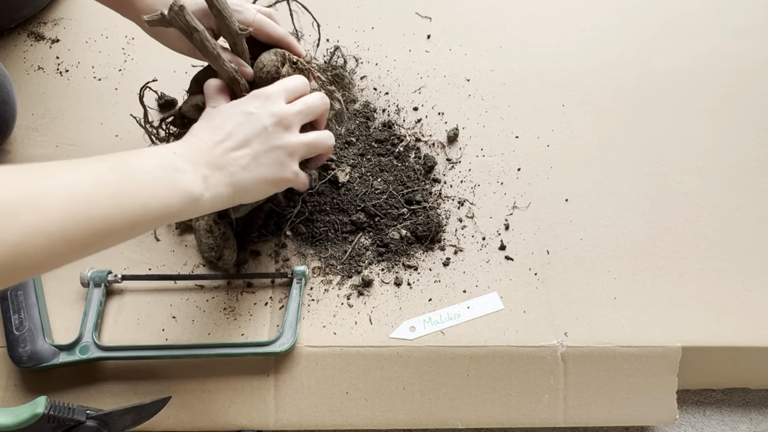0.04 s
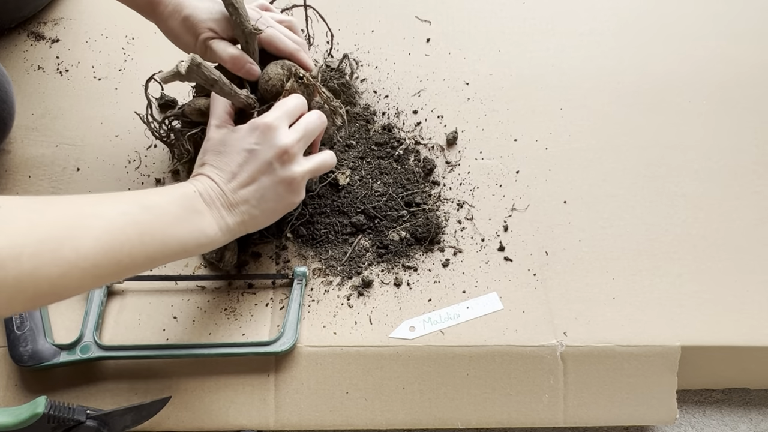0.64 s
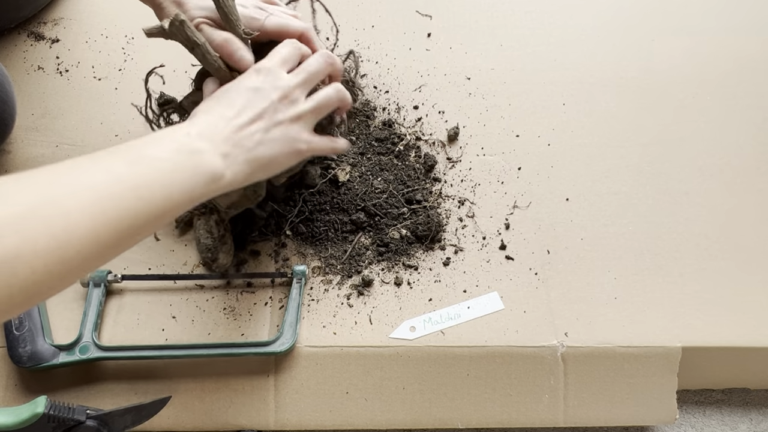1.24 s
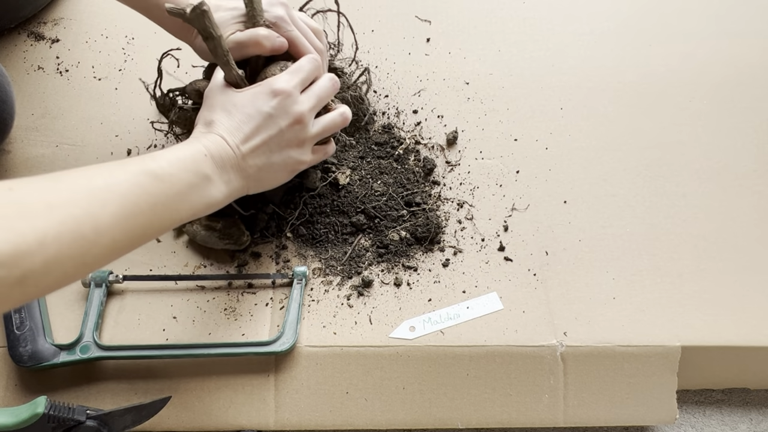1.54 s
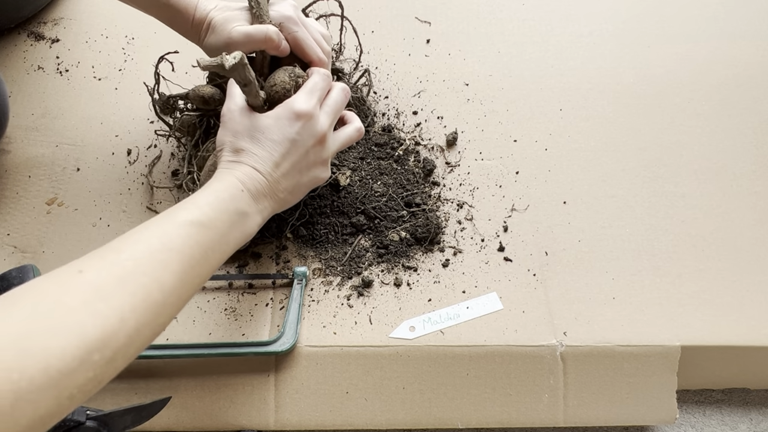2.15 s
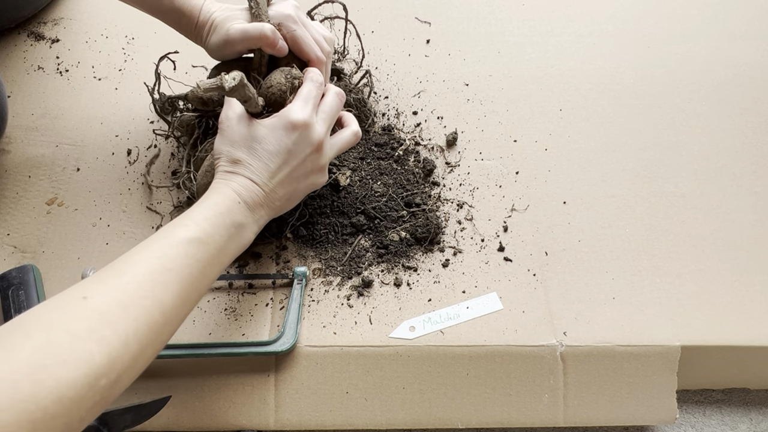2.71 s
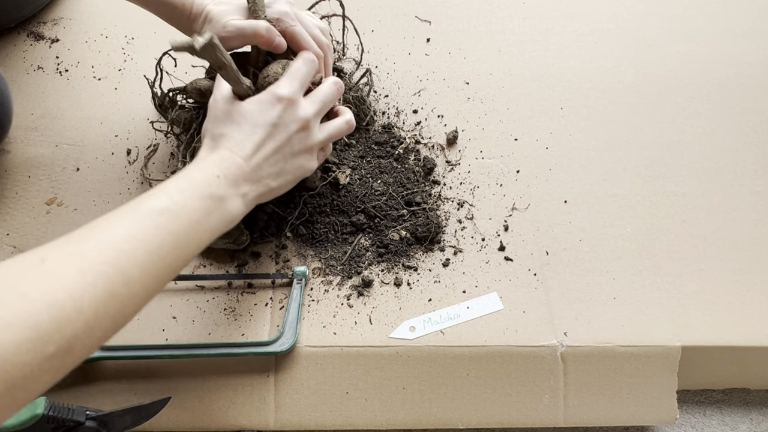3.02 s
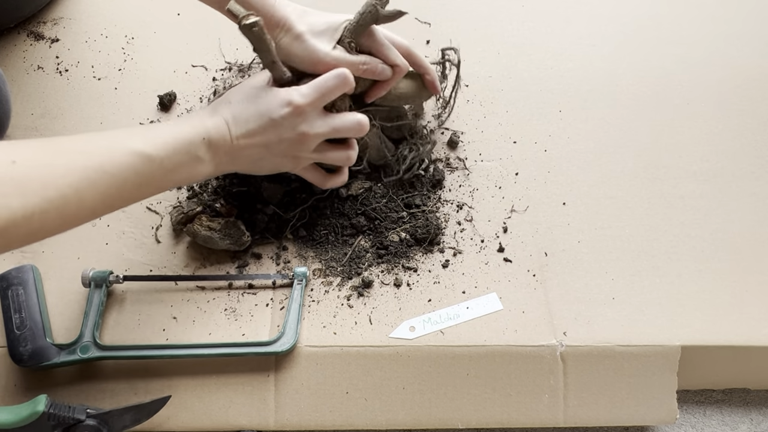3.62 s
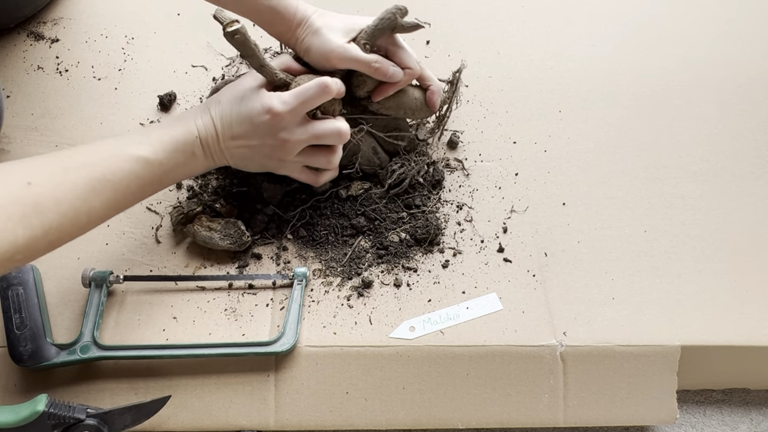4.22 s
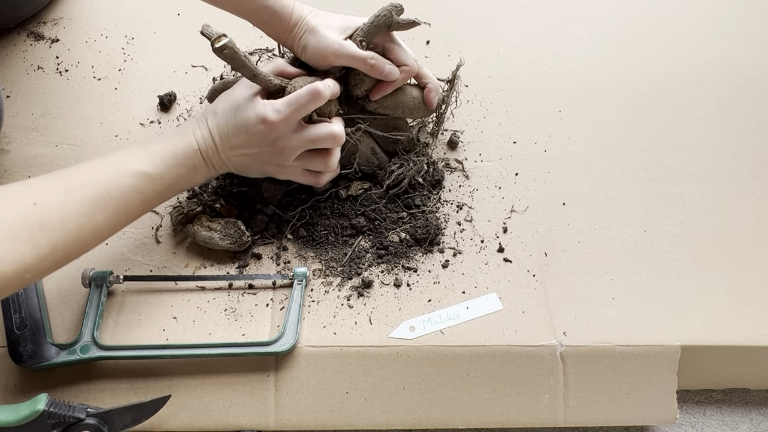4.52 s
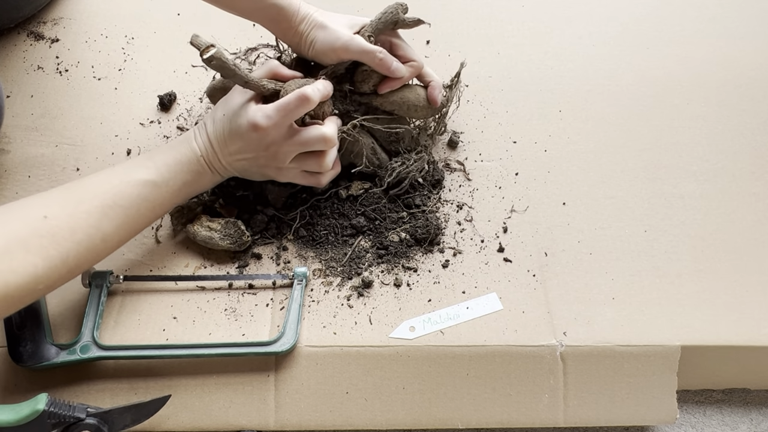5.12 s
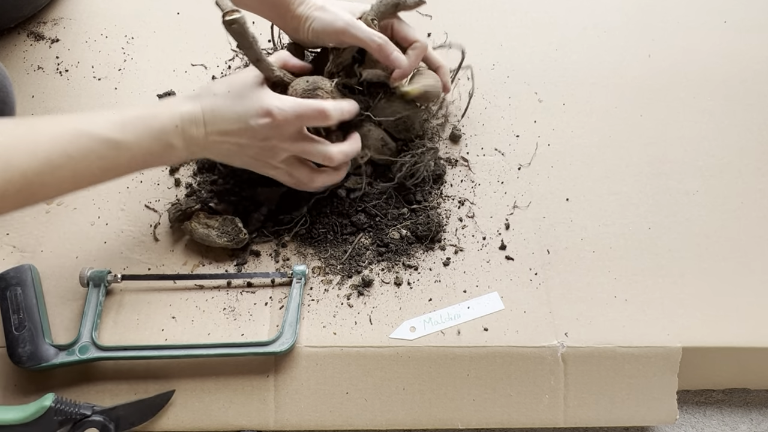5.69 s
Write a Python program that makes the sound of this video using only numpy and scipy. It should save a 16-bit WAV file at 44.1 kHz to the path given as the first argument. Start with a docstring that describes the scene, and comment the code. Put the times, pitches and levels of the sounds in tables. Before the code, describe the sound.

Hands twist a dry root clump apart on cardboard, with sharp snaps, crackling fibres, crumbling soil and soft knocks.

```python
"""In a small room, two hands twist a dry clump of tubers apart on a sheet of cardboard.
Roots snap one by one or tear in bundles of fibres: each fracture releases strain as a sharp crack,
and the recoiling root clacks and rings. Soil and rootlets crackle, while the clump's knocks and
friction drive the resonances of the sheet. The walls echo briefly over a low rumble.
A camera with two closely spaced microphones looks down on the work."""
import sys
import numpy as np
from scipy import signal
from scipy.fft import rfft, irfft, next_fast_len
from scipy.io import wavfile
from scipy.ndimage import map_coordinates

SR = 44100
rng = np.random.default_rng(int(sys.argv[2]) if len(sys.argv) > 2 else 0)


def bounce(signal):
    """Save signal as a 16-bit WAV file at the path given by the first command-line argument."""
    frames = np.transpose(np.atleast_2d(signal))
    limited = np.clip(frames, -1, 1)
    pcm = np.round(limited * 32767).astype(np.int16)
    wavfile.write(sys.argv[1], SR, pcm)


N = 253575
TIME = np.arange(N) / SR

# Roots break. Each row: start in seconds, relative crack and clack levels in dB, ring pitch in Hz.
ROOT_SNAPS = [(1.318, -40, -33.5, 1600), (1.5553, -44, -32, 2330), (1.8075, -56, -42, 1860),
              (1.828, -37.5, -45, 1870), (1.9104, -33, -27.5, 1600), (2.0542, -36.5, -46, 1890),
              (2.0759, -37, -37.5, 1870), (2.0989, -43.5, -39, 1750), (2.2536, -31, -39, 1760),
              (2.8858, -29.5, -39.5, 2700), (2.9982, -39, -40.5, 2060), (3.7038, -34, -35, 1970),
              (3.934, -54, -31, 2000), (4.1326, -23, -29, 2270), (4.143, -22, -30.5, 1980),
              (4.1528, -20, -23.5, 1750), (4.54, -26, -27.5, 2160), (4.717, -38, -41, 2270),
              (4.7418, -20.5, -20.5, 990), (4.7513, -21, -30, 2470), (4.7621, -25, -18, 1970),
              (5.024, -28.5, -46, 2570), (5.2655, -17.5, -22.5, 1890), (5.2905, -19, -27.5, 3760),
              (5.2998, -17.5, -32, 2620)]
# Fibre bundles tear. Each row: start in seconds, length in seconds, level in dB.
BUNDLE_TEARS = [(4.129, 0.04, -35), (4.739, 0.024, -33), (5.273, 0.019, -37.5), (5.296, 0.029, -26.5)]
# Resonances of the sheet. Each row: frequency in Hz, bandwidth in Hz, gain in dB.
CARDBOARD_MODES = [(75, 41, -6), (206.4, 24, -3.5), (431, 270, -7), (446, 87, 0), (721.6, 36.5, -4),
                   (900, 76, -9), (1063, 123, -6), (1320, 63, -5.5), (1672, 156, -9)]
# Tone colours of the cracks, clacks and crackle; the dips near 9.8 and 14.2 kHz come from the
# camera's audio coding. Each row: frequency in Hz, relative spectral density in dB.
CRACK_COLOUR = [(300, -14), (1500, -12), (4000, 3), (7500, -1.5), (9800, -12), (11200, 3.5), (12800, 3),
                (14200, -11), (16000, -2)]
CLACK_COLOUR = [(150, -16.5), (700, -0.5), (1200, -0.5), (1900, 6.5), (4000, -0.5), (6500, -3.5),
                (12000, -9.5)]
CRACKLE_COLOUR = [(150, -14), (700, -4.5), (3000, -6), (7500, -7), (9800, -18.5), (11100, -0.5),
                  (12900, -0.5), (14200, -7), (16000, -12.5)]


def cracks(events, crack_t60, splinter_db, tilt_db_per_octave, strain_s=0.0008, lead_s=0.002):
    """Brittle fracture releases strain as a noise burst and splinters; thinner fibres sound brighter."""
    out = np.zeros((2, N))
    t = np.arange(SR // 20) / SR - lead_s
    after = np.maximum(t, 0)
    onset = np.exp(np.minimum(t, 0) / strain_s)  # the first fibres part just before the break
    spectrum = [(hz, db + tilt_db_per_octave * np.log2(hz)) for hz, db in CRACK_COLOUR]
    for s, db, *_ in events:
        burst = rng.standard_normal((2, len(t))) * amp(-60 * after / crack_t60)
        splinters = grains(len(t), rate=5000, scatter_db=5) * amp(-60 * after / .03)
        crack = compact(onset * (burst + amp(splinter_db) * splinters), spread=.35)
        add(out, s - lead_s, at_level(coloured(crack, spectrum), db - 4, span_s=2 * lead_s))
    return out


def clacks(shudder_t60=0.025, shudder_db=-19, ring_db=-3):
    """Elastic recoil jolts a broken root, which shudders and rings at a pitch set by its thickness."""
    # Modes of a medium stem. Each row: frequency in Hz, bandwidth in Hz, gain in dB.
    stem_modes = [(830, 200, -6), (1910, 260, 29), (2830, 740, 4), (4700, 1150, 2)]
    stem_hz = stem_modes[1][0]  # the second mode gives the pitch
    out, t = np.zeros((2, N)), np.arange(SR // 20) / SR
    for s, _, db, ring_hz in ROOT_SNAPS:
        force = compact(jolt(t, shudder_db, shudder_t60), spread=.7)
        ring = filtered(force, lambda hz: resonances(hz * stem_hz / ring_hz, stem_modes))
        clack = unit(coloured(force, CLACK_COLOUR)) + amp(ring_db) * unit(ring)
        add(out, s, at_level(clack, db - 2, span_s=.004))
    return out


def ticks():
    """Hair-thin fibres fracture with a bright tick and no resonance."""
    # Each row: start in seconds, relative level in dB.
    fibre_breaks = [(0.321, -37), (1.093, -45), (1.11, -43), (1.7136, -43), (1.8946, -35.5), (1.955, -42.5),
                    (1.984, -52), (2.297, -46), (2.3205, -39), (2.3255, -37), (2.3825, -39), (2.392, -48),
                    (2.52, -46), (2.5805, -42), (2.588, -38), (2.657, -41), (2.673, -35.5), (2.692, -35.5),
                    (2.716, -39.5), (2.7715, -41), (2.861, -45), (3.241, -34), (3.804, -35.5), (3.916, -39),
                    (3.951, -36.5), (4.073, -41.5), (4.1245, -28), (4.2405, -44), (4.665, -44),
                    (4.786, -37), (4.9481, -32), (4.983, -33.5), (5.11, -44), (5.2358, -22.5),
                    (5.2555, -23), (5.272, -24)]
    return cracks(fibre_breaks, crack_t60=0.0058, splinter_db=-4, tilt_db_per_octave=6)


def tears(release_t60=0.012, wood_db=-2):
    """Fracture cascades through a bundle, each fibre splintering and shaking the root."""
    out = np.zeros((2, N))
    for s, length, db in BUNDLE_TEARS:
        t = np.arange(round((length + 2 * release_t60) * SR)) / SR
        fibres = compact(grains(len(t), rate=5300, scatter_db=5.5), spread=.45)
        rip = unit(coloured(fibres, CRACK_COLOUR) + amp(wood_db) * coloured(fibres, CLACK_COLOUR))
        add(out, s, rip * amp(db - 60 * np.maximum(t - length, 0) / release_t60))
    return out


def knocks(settle_t60=0.056, settle_db=-21, contact_q=4, weight=0.85):
    """Contact acts as a low-pass spring: soft bumps excite the sheet's low modes, hard ones the high."""
    # Each row: start in seconds, level in dB, contact resonance in Hz.
    impacts = [(0.096, -42.5, 510), (1.11, -46.5, 1080), (1.154, -45, 1210), (1.312, -35, 1600),
               (1.341, -39.5, 1570), (1.915, -41.5, 660), (2.283, -53, 760), (2.692, -48, 710),
               (3.333, -32.5, 1390), (3.3745, -30, 1170), (3.431, -25, 1190), (3.711, -45.5, 610),
               (4.156, -33.5, 845), (4.742, -30, 920), (4.763, -32, 835), (5.3194, -23.5, 570),
               (5.732, -30, 840), (5.744, -39, 790)]
    out, t = np.zeros((2, N)), np.arange(SR // 8) / SR
    contact = lambda ratio: (weight + 1j * ratio) / (1 + 1j * ratio / contact_q - ratio ** 2)
    for s, db, contact_hz in impacts:
        force = broad(jolt(t, settle_db, settle_t60))
        thud = filtered(force, lambda hz: resonances(hz, CARDBOARD_MODES) * contact(hz / contact_hz))
        add(out, s, at_level(thud, db, span_s=.006))
    return out


def stroke_envelope(length, attack_share=0.12, swell_db=14, release_db_per_s=273):
    """Amplitude follows force: the hands take hold, lean in and let go."""
    t = np.arange(SR // 2) / SR
    attack = np.clip(t / (attack_share * length), 0, 1)
    leaning_db = swell_db * np.clip(t / length - 1, -1, 0)
    return attack * amp(leaning_db - release_db_per_s * np.maximum(t - length, 0))


def effort(spill_scrape_db=-7.5, spill_soil_db=-10.5, spill_db_per_s=160):
    """Incoherent sources add in power: grip, strokes and spills give scrape and soil levels in dB."""
    # The steady grip. Each row: time in seconds, rustle level in dB.
    grip = [(0, -54.5), (.42, -58.5), (.73, -61.5), (.86, -66.5), (.92, -73), (1.0, -61.5), (1.15, -55.5),
            (1.5, -77), (1.62, -59), (2.1, -62.5), (2.23, -72.5), (2.37, -58), (2.54, -71), (2.76, -61),
            (2.85, -65.5), (2.92, -61.5), (3.15, -57), (3.27, -56), (3.48, -46), (3.68, -53), (4.1, -56.5),
            (4.47, -68.5), (4.9, -55), (5.08, -72), (5.21, -60.5), (5.5, -51.5)]
    # Pushes and twists. Each row: start and length in seconds, scrape and soil levels in dB.
    strokes = [(0.0, 0.034, -42, -46.5), (0.189, 0.11, -46, -57), (0.306, 0.032, -39.5, -50.5),
               (0.571, 0.03, -48, -57), (1.053, 0.053, -43.5, -72), (1.141, 0.18, -38, -45),
               (1.379, 0.061, -39, -48), (1.442, 0.094, -40.5, -41), (1.775, 0.033, -50.5, -50.5),
               (2.618, 0.088, -51.5, -50), (3.038, 0.061, -45, -51.5), (3.191, 0.044, -37.5, -38.5),
               (3.266, 0.16, -30.5, -32.5), (3.519, 0.042, -36.5, -50), (3.796, 0.065, -45.5, -42),
               (4.197, 0.025, -43, -42.5), (4.626, 0.011, -52, -52.5), (4.813, 0.038, -43.5, -46.5),
               (4.946, 0.07, -54, -45.5), (5.1, 0.03, -67, -50), (5.387, 0.095, -44, -45.5),
               (5.527, 0.49, -34, -47)]
    grip_db = np.interp(TIME, *np.transpose(grip))
    power = amp([grip_db, grip_db]) ** 2
    for s, length, scrape_db, soil_db in strokes:
        add(power, s, (amp([[scrape_db], [soil_db]]) * stroke_envelope(length)) ** 2)
    for s, length, db in BUNDLE_TEARS:  # a tear lets the clump slide and shakes soil loose
        spill = (TIME > s) * amp(db - spill_db_per_s * np.maximum(TIME - s - length, 0))
        power += (amp([[spill_scrape_db], [spill_soil_db]]) * spill) ** 2
    return 10 * np.log10(power)


def rubbing(slide_db, crumble_db, scrape_db=-4, ring_db=-6, soil_db=-3, rootlet_db=-4, jerk_db=1.5):
    """Friction is a train of tiny impacts: grit slips on the sheet; soil crumbles densely under load."""
    # Each row: frequency in Hz, relative density in dB.
    scrape_spectrum = [(100, -32.5), (300, -7.5), (600, -7.5), (1400, -12), (4000, -19.5), (8000, -29.5)]
    slips = broad(grains(N, rate=1400, scatter_db=2.5))
    scrape = amp(scrape_db) * unit(coloured(slips, scrape_spectrum))
    catches = broad(grains(N, rate=760, scatter_db=2))
    ring = amp(ring_db) * unit(filtered(catches, lambda hz: resonances(hz, CARDBOARD_MODES)))
    grains_per_s = 1000 + 200000 * amp(crumble_db)
    particles = unit(grains(N, rate=grains_per_s, scatter_db=5) / np.sqrt(grains_per_s))
    dust = .5 * rng.standard_normal((2, N))
    soil = amp(soil_db) * unit(coloured(compact(particles + dust, spread=.4), CRACKLE_COLOUR))
    flicks = pings(N / SR, rate=330, centre_hz=2235, spread=0.374, cycles=23, scatter_db=3.5, count=4000)
    rootlets = amp(rootlet_db) * unit(flicks[:, :N])
    jerks = amp(jerk_db * wobble(70))  # the clump moves unevenly
    return jerks * (amp(slide_db) * (scrape + ring) + amp(crumble_db) * (soil + rootlets))


def drags(flex=0.0693):
    """Stick-slip friction drums on the sheet, which flexes so that its ring wanders in pitch."""
    # Each row: start in seconds, length in seconds, level in dB.
    judders = [(0.089, 0.024, -47), (1.242, 0.065, -47), (2.672, 0.037, -53.5), (3.202, 0.12, -45.5),
               (3.315, 0.145, -29.5), (5.57, 0.06, -42), (5.634, 0.075, -44.5)]
    # The sheet under the hands' weight. Each row: frequency in Hz, bandwidth in Hz, gain in dB.
    hollow_modes = [(633, 200, 3), (976, 69, 10), (1307, 61, 13), (2540, 2600, -8.5)]
    out = np.zeros((2, N))
    for s, length, db in judders:
        n = round(length * SR)
        slips = compact(grains(n, rate=1500, scatter_db=3), spread=.35)
        ring = filtered(slips, lambda hz: resonances(hz, hollow_modes))
        clock = np.cumsum(np.exp(flex * wobble(90)[:n]))
        bent = np.array([np.interp(clock * n / clock[-1], np.arange(n), side) for side in ring])
        swell = np.sin(np.linspace(0, 1, n) ** 1.12 * np.pi)
        add(out, s, amp(db) * unit(swell * bent))
    return out


def radiated(x):
    """Directivity: the sheet radiates each frequency more to one side."""
    # Each row: frequency in Hz, left minus right level in dB.
    balance = [(200, 2), (450, -2), (700, -4), (1150, 3), (2200, -2.5)]
    return filtered(x, lambda hz: amp(np.outer([.5, -.5], along(balance, hz))))


def crunches():
    """Compression cracks fibres in an uneven run and crumbles the soil between them."""
    # Each row: start in seconds, length in seconds, level in dB.
    squeezes = [(1.526, 0.015, -42), (2.65, 0.065, -52), (2.77, 0.055, -54), (3.052, 0.021, -46.5),
                (3.556, 0.032, -41), (3.618, 0.013, -49)]
    out = np.zeros((2, N))
    for s, length, db in squeezes:
        fractures = pings(length, rate=870, centre_hz=3146, spread=0.35, cycles=67, scatter_db=2)
        add(out, s, at_level(dusty(fractures, dust_db=0), db, span_s=length))
    return out


def crumbs(skitter_s=.009):
    """Impact on the sheet scatters a crumb of soil in a fading run of taps."""
    # Each row: start in seconds, level in dB.
    landings = [(0.344, -52), (0.453, -48.5), (0.4752, -53), (0.7912, -58.5), (0.848, -54.5),
                (0.983, -53.5), (1.0894, -54.5), (3.269, -46)]
    out = np.zeros((2, N))
    for s, db in landings:
        taps = pings(skitter_s, rate=2200, centre_hz=1820, spread=0.56, cycles=35, scatter_db=7.5)
        fade = np.exp(-np.arange(taps.shape[1]) / SR / skitter_s)
        add(out, s, at_level(dusty(taps * fade, dust_db=-2.5), db, span_s=skitter_s))
    return out


def pings(length, rate, centre_hz, spread, cycles, scatter_db, count=100):
    """Tiny fractures ring as damped oscillators of random pitch, falling 60 dB over the given cycles."""
    draws = rng.standard_normal((count, 5))
    gaps = np.mean(draws[:, :2] ** 2, axis=1) / rate  # exponential waiting times
    t = np.arange(SR // 100) / SR
    run = np.zeros((2, round(length * SR) + len(t)))
    for s, (pitch, size, side) in zip(np.cumsum(gaps) - gaps[0], draws[:, 2:]):
        if s < length:
            turns = centre_hz * np.exp(spread * np.clip(pitch, -2, 2)) * t
            ping = amp(scatter_db * size - 60 * turns / cycles) * np.sin(2 * np.pi * turns)
            add(run, s, np.outer([1, side], ping))
    return compact(run, spread=.4)


def dusty(sound, dust_db):
    """A puff of dust adds noise, amplitude-modulated by the sound's strength."""
    dust = np.abs(sound[0]) * rng.standard_normal(sound.shape)
    puff = coloured(compact(dust, spread=.4), CRACKLE_COLOUR)
    return unit(sound) + amp(dust_db) * unit(puff)


def room(x, gap_s=0.0062, patterns=16):
    """Diffuse reverberation: a short noise tail, drawn afresh at regular intervals, decays by band."""
    # Each row: frequency in Hz, time to fall 60 dB in seconds.
    decay_times = [(500, 0.36), (1500, 0.21), (7000, 0.34), (16000, 0.027)]
    out, edges = np.zeros((2, N)), np.linspace(0, N, patterns + 1).astype(int)
    for a, b in zip(edges, edges[1:]):
        hz, t, noise = signal.stft(rng.standard_normal((2, SR // 2)), SR, nperseg=256)
        decay = amp(-60 * t / along(decay_times, hz)[:, None])
        tail = broad(signal.istft(noise * decay, SR, nperseg=256)[1])
        add(out, a / SR + gap_s, signal.fftconvolve(x[:, a:b], tail / np.linalg.norm(tail[0]), axes=1))
    return out


def background():
    """Ambient noise: a low rumble with faint hiss sinks, then rises once the clump has shifted."""
    # Each row: frequency in Hz, relative density in dB.
    rumble_spectrum = [(20, -21), (36, -13.5), (52, 7), (80, -6), (160, -7), (280, -24.5), (2000, -29),
                       (9000, -38), (12000, -34)]
    level_db = np.interp(TIME, [0, 1.4, 2.7, 3.4], [-59, -59, -63, -57])
    return amp(level_db) * unit(coloured(broad(rng.standard_normal((2, N))), rumble_spectrum))


def broad(pair):
    """An extended source is coherent at the two microphones in the bass, hardly so in the treble."""
    # Each row: frequency in Hz, left-right correlation.
    coherence = [(60, 0.92), (250, 0.78), (600, 0.39), (1400, 0.15), (3000, 0.012)]
    angle = lambda hz: np.arccos(np.clip(along(coherence, hz), -1, 1)) / 2
    mid, side = filtered(pair, lambda hz: np.array([np.cos(angle(hz)), np.sin(angle(hz))]))
    return np.array([mid + side, mid - side])


def compact(pair, spread, lag_samples=11):
    """Arrival-time difference: a small source's top treble reaches the left microphone first."""
    left, right = pair[0] + spread * pair[1], pair[0] - spread * pair[1]
    late = filtered(right, lambda hz: np.exp(-2j * np.pi * np.maximum(hz * lag_samples / SR, 2)))
    return np.array([left, late])


def jolt(t, tail_db, t60):
    """An impulsive force with an exponentially decaying tail of noise."""
    force = rng.standard_normal((2, len(t))) * amp(tail_db - 60 * t / t60)
    force[0, 0] += 1
    return force


def grains(n, rate, scatter_db):
    """Shot noise: two streams of uneven impulses, about rate a second, at rms 1."""
    sizes = amp(scatter_db * np.clip(rng.standard_normal((2, n)), -2, 2))
    return unit((rng.random((2, n)) < rate / SR) * sizes * rng.choice([-1, 1], (2, n)))


def resonances(hz, modes):
    """Modal superposition: damped resonances sum with alternating sign."""
    return sum((-1) ** k * amp(db) * 1j * hz * width / (centre ** 2 - hz ** 2 + 1j * hz * width)
               for k, (centre, width, db) in enumerate(modes))


def coloured(x, spectrum, size=2048):
    """A minimum-phase filter of unit energy, which keeps the sharp front of a click."""
    cepstrum = irfft(np.log(amp(along(spectrum, np.fft.rfftfreq(size, 1 / SR)))))
    cepstrum[1:size // 2] *= 2
    cepstrum[size // 2 + 1:] = 0
    kernel = irfft(np.exp(rfft(cepstrum)))
    return signal.fftconvolve(x, kernel[None] / np.linalg.norm(kernel), axes=1)[:, :x.shape[1]]


def filtered(x, response):
    """Linear filtering: the spectrum of x times a complex frequency response."""
    n = x.shape[-1]
    padded = next_fast_len(n + SR // 8)
    return irfft(rfft(x, padded) * response(np.fft.rfftfreq(padded, 1 / SR)), padded)[..., :n]


def wobble(rate):
    """A smooth random curve, rate knots a second."""
    return map_coordinates(rng.standard_normal(int(N * rate / SR) + 4), [TIME * rate])


def along(points, hz):
    """Interpolation on a logarithmic frequency axis."""
    frequencies, values = np.transpose(points)
    return np.interp(np.log(hz + 1), np.log(frequencies), values)


def amp(db):
    """Decibels to gain."""
    return 10 ** (np.asarray(db) / 20)


def unit(x):
    """x at rms 1."""
    return x / np.sqrt(np.mean(x ** 2) + 1e-20)


def at_level(sound, db, span_s):
    """The sound scaled to an rms level over its first span_s seconds."""
    return sound * amp(db) / np.sqrt(np.mean(sound[:, :round(span_s * SR)] ** 2) + 1e-20)


def add(track, s, sound):
    """Superpose a two-channel signal on the track at s seconds."""
    part = track[:, max(round(s * SR), 0):][:, :sound.shape[1]]
    part += sound[:, :part.shape[1]]


def scene(break_room_db=-11, rub_room_db=-12, knock_room_db=-16):
    """The direct sound of breaks, bumps and rubbing superposes with reverberation and rumble."""
    snaps = cracks(ROOT_SNAPS, crack_t60=0.0016, splinter_db=-13.5, tilt_db_per_octave=4.5) + clacks()
    breaks = snaps + ticks() + tears()
    bumps = radiated(knocks())
    rub = rubbing(*effort()) + radiated(drags()) + crumbs() + crunches()
    echoes = room(amp(break_room_db) * breaks + amp(rub_room_db) * rub + amp(knock_room_db) * bumps)
    return breaks + bumps + rub + echoes + background()


def record(dry):
    """Band limiting: the camera cuts off steeply above 15.8 kHz."""
    return filtered(dry, lambda hz: 1 / np.sqrt(1 + (hz / 15800) ** 200))


dry = scene()
out = record(dry)
bounce(out)
```